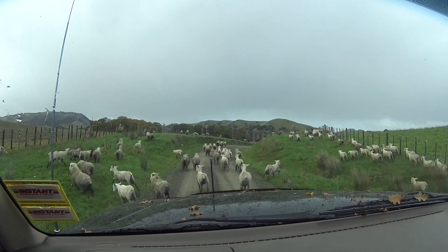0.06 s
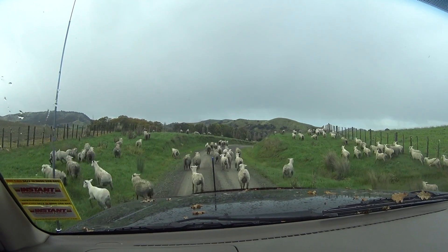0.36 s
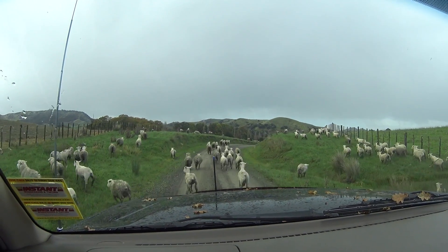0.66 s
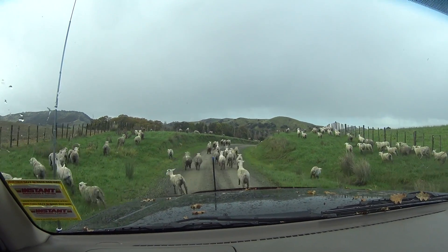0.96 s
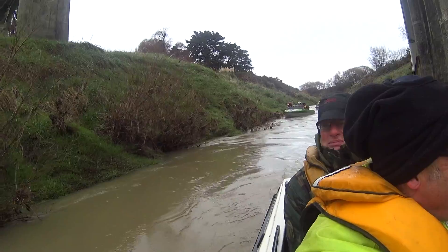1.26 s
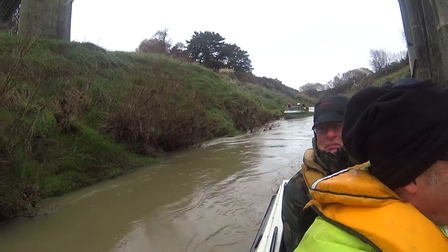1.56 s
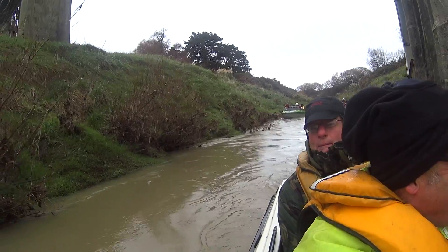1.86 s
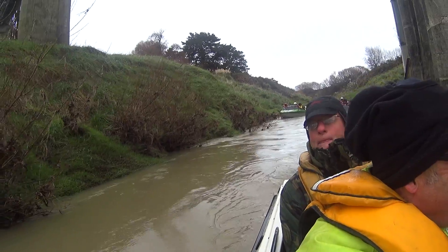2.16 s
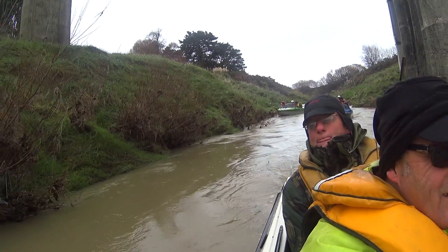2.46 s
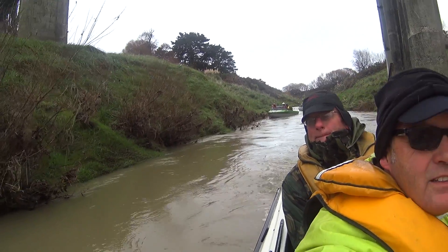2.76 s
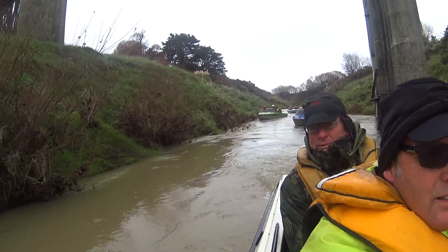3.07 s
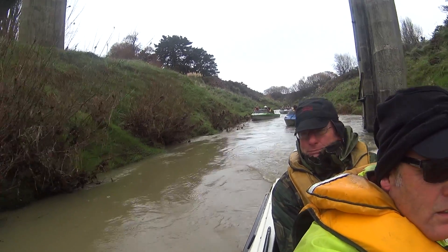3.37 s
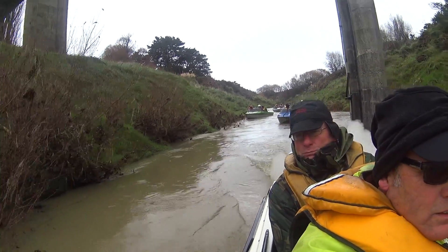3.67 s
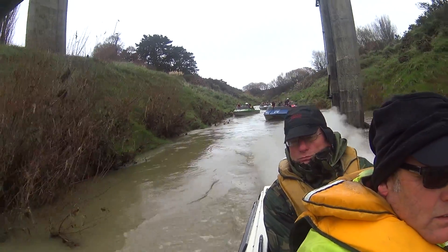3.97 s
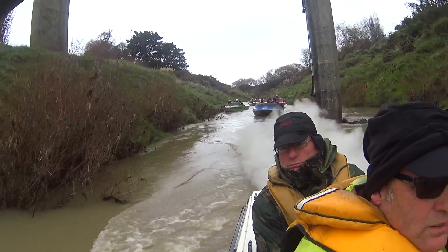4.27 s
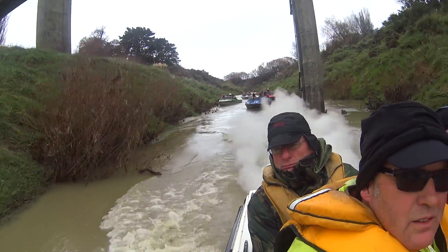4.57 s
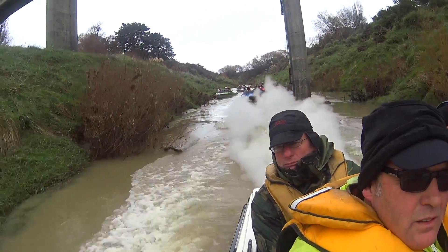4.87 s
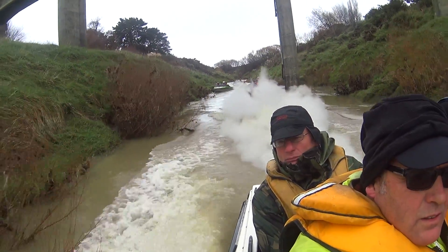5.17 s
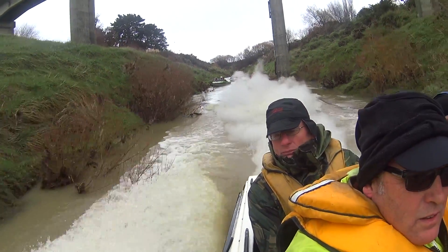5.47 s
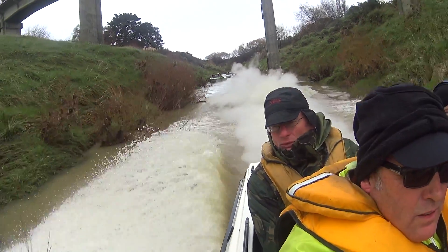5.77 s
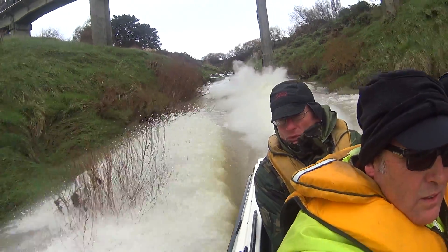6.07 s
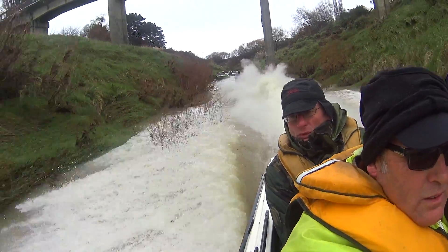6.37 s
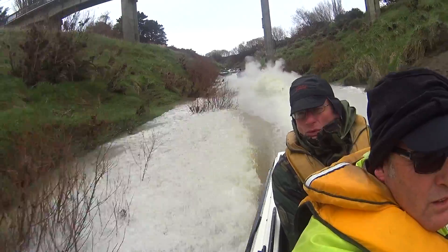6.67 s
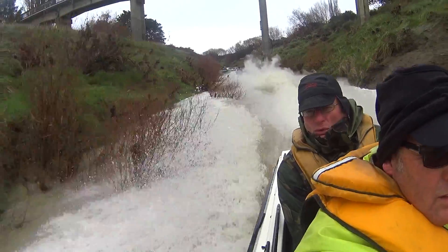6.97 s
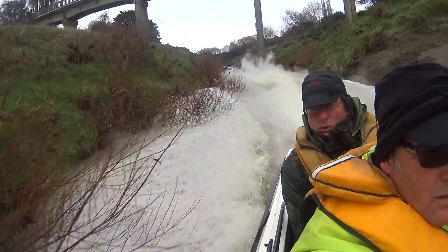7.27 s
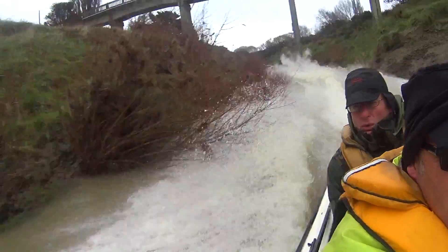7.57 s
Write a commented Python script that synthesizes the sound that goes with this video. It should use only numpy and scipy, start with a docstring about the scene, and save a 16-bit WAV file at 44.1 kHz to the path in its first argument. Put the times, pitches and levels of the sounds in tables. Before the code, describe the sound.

Quiet road rumble inside a car ends with a soft thud after about a second. The sound switches suddenly to a jet boat on a river, heard from aboard, its engine burbling at idle among small knocks and splashes. The engine then revs up hard, droning and rasping as the jet churns the water. Spray hisses louder and louder over low wind buffeting, and the revs ease a little near the end.

```python
"""First a car rolls quietly for a second, heard from inside, and goes over a soft bump.
Then we are suddenly aboard a V8 jet boat on a river, its engine burbling at idle among small knocks.
At about two seconds it revs up hard: the exhaust drones and rasps, and the jet churns the water.
The hull rises to skim the river (it planes), and the sheet of spray hisses ever louder.
Near the end the engine eases back a little."""
import sys
import numpy as np
from scipy import signal
from scipy.fft import rfft, irfft, next_fast_len
from scipy.io import wavfile

SR = 44100
rng = np.random.default_rng(int(sys.argv[2]) if len(sys.argv) > 2 else 0)


def transcribe(u):
    """Save the signal u as a 16-bit wav file named by the first command-line argument.

    u: samples, shape (n,) or (channels, n), limited to [-1, 1]; the rate is SR.
    q: integer samples, one column per channel.
    """
    v = np.clip(np.atleast_2d(u).T, -1, 1)
    q = np.round(v * 32767).astype(np.int16)
    wavfile.write(sys.argv[1], SR, q)


N = 340893
TIME = np.arange(N) / SR
PADDED = next_fast_len(N + 4096)


def from_db(db):
    """Turn decibels into a number to multiply by."""
    return 10 ** (np.asarray(db) / 20)


def rms_one(x):
    """Scale a sound so that its average strength (rms) is 1."""
    return x / np.sqrt(np.mean(x ** 2) + 1e-20)


def in_time(*tables):
    """Join the (time_s, value) points of the tables with straight lines."""
    return np.interp(TIME, *np.vstack(tables).T)


def ramp(start_s, length_s):
    """Rise evenly from 0 to 1."""
    return np.clip((TIME - start_s) / length_s, 0, 1)


def swells(rows):
    """Add up bell-shaped rises and dips, in dB."""
    return sum(db * np.exp(-((TIME - s) / half_s) ** 2) for s, half_s, db in rows)


def drift(rate_hz):
    """A smooth random wobble, about 1 in size."""
    step = 40   # samples between random points
    pole = np.exp(-2 * step * np.pi * rate_hz / SR)
    noise = rng.standard_normal(N // step + 2002)
    slow = signal.lfilter([1], [1, -2 * pole, pole * pole], noise)[2000:]
    return np.interp(np.arange(N) / step, np.arange(len(slow)), rms_one(slow))


def coloured(x, spectrum, skirt_db=18):
    """Shape a sound by a (pitch_hz, level_db) table; past its ends, lose skirt_db per octave."""
    hz, db = np.transpose(spectrum)
    bins = np.maximum(np.arange(PADDED // 2 + 1) * SR / PADDED, 1)
    octaves_outside = np.abs(np.log2(bins / np.clip(bins, hz[0], hz[-1])))
    gain = from_db(np.interp(np.log(bins), np.log(hz), db) - skirt_db * octaves_outside)
    return irfft(rfft(x, PADDED) * gain, PADDED)[..., :N]


def placed(x, sides):
    """Make one side louder and the other quieter, pitch by pitch."""
    left, right = np.broadcast_to(x, (2, N))
    return np.array([coloured(left, np.multiply(sides, [1, .5]), skirt_db=0),
                     coloured(right, np.multiply(sides, [1, -.5]), skirt_db=0)])


def turbulence(spectrum, width):
    """Rushing stereo noise of strength 1; more width makes left and right less alike."""
    mid, side = rng.standard_normal((2, N))
    return rms_one(coloured(mid + width * side * np.array([[1], [-1]]), spectrum))


def resonating(hz, width_hz):
    """Noise of strength 1 that rings around one pitch."""
    pole = np.exp(-np.pi * abs(width_hz) / SR)
    section = [1, 0, -1, 1, -2 * pole * np.cos(2 * np.pi * hz / SR), pole * pole]
    return rms_one(signal.sosfilt([section, section], rng.standard_normal(N)))


def partial(cycles, multiple):
    """A pure tone of strength 1 at a multiple of the engine's cycle rate."""
    return np.sqrt(2) * np.sin(2 * np.pi * (multiple * cycles + rng.random()))


def unsteady(cycles, rough, flutter_hz, multiple):
    """A tone whose strength and timing wobble at random."""
    steady = np.exp(2j * np.pi * (multiple * cycles + rng.random()))
    flutter = 1 + rough * (drift(flutter_hz) + 1j * drift(flutter_hz))
    return (steady * flutter).real / np.sqrt(.5 + rough ** 2)


def car():
    """The road rumbles in the cabin, and one bump gives a dull thud."""
    # road noise: pitch_hz, level_db
    cabin = [(24, -11), (46, 2), (75, -9.5), (150, -3.5), (280, -19.5), (355, -16), (800, -27), (1050, -25),
             (1200, -17), (1980, -20), (2450, -15.5), (3400, -24), (4700, -21.5), (10000, -46)]
    start_s, pitch_hz, attack_s, decay_s = 0.97, 94, 0.003, 0.0051
    age = np.maximum(TIME - start_s, 0)
    envelope = np.exp(-age / decay_s) * (1 - np.exp(-age / attack_s))
    bump = from_db(-16) * np.sin(2 * np.pi * pitch_hz * age) * envelope
    return from_db(-47.5) * turbulence(cabin, width=0.42) - bump


def hull_boom_db(hz, planing):
    """An exhaust tone swells at pitches where the hull rings, less so once the stern lifts."""
    # the boom with the stern low: pitch_hz, level_db
    stern_low = [(75, -33), (105, -21), (116, -21.5), (126, -25.5), (155, -21), (175, -17.5), (192, -22),
                 (215, -15.5), (245, -20), (290, -33.5)]
    # the boom while planing: pitch_hz, level_db
    skimming = [(138, -28.5), (155, -27), (170, -22.5), (185, -28.5), (222, -20.5), (248, -25.5),
                (295, -31)]
    # the drone briefly swells or sags: time_s, half_length_s, change_db
    surges = [(1.88, 0.056, -13), (2.113, .04, 9), (2.416, .04, 4), (2.505, 0.023, -3), (2.65, 0.023, -2),
              (2.73, .05, 4.5), (4.062, 0.057, -6), (4.3, 0.039, 3), (4.69, .06, -3), (6.928, .06, 6.5),
              (7.053, 0.045, -3.5)]
    low_db = np.interp(hz, *np.transpose(stern_low))
    skimming_db = np.interp(hz, *np.transpose(skimming))
    idle_db = -12 * (1 - ramp(start_s=2.256, length_s=0.059))
    surge_db = swells(surges) + 1.74 * drift(5.2)
    return (1 - planing) * low_db + planing * skimming_db + idle_db + surge_db


def exhaust(cycles, fifth_db, eighth_db, bark_db, rough):
    """Each row of cylinders fires unevenly, making many tones; multiples 5 and 8 boom."""
    # the other exhaust tones: cycle_multiple, level_db
    tones = [(2, -8), (3, -2.5), (4, -4), (6, -1), (7, -9.5), (9, -20), (10, -2.5), (11, -4), (12, 1),
             (13, -4.5), (14, -11.5), (15, -12), (16, -2.5), (17, -4.5), (18, -3), (19, -13), (20, -31),
             (21, -7), (22, -14)]
    # how the pipes and hull ring: pitch_hz, gain_db
    pipes = [(45, -7), (70, -1.5), (88, -4), (110, 0), (190, 2.5), (225, 4), (300, -1.5), (368, 3.5),
             (440, -0.5), (510, -1), (620, -2), (900, -15)]
    # rushing gas: pitch_hz, level_db
    rumble = [(30, -23), (60, -25), (95, -1.5), (120, -4), (200, 3), (330, -2), (480, 0.5), (700, -9.5),
              (1100, -17.5)]
    # the idle burble's noise: pitch_hz, level_db
    idle_rumble = [(22, -30), (46, -29), (65, -18), (115, 2.5), (200, -5.5), (300, -14), (500, -24)]
    # the burble's loudness: time_s, level_db
    burble_levels = [(1.08, -37), (1.55, -35.5), (1.87, -38), (2.1, -27.5), (2.22, -27.5), (2.4, -37),
                     (3.0, -62)]
    boom = from_db(fifth_db) * unsteady(cycles, .22 * rough, flutter_hz=15, multiple=5)
    boom += from_db(eighth_db) * unsteady(cycles, 0.47 * rough, flutter_hz=12, multiple=8)
    # timing errors blur the high multiples most
    bark = sum(from_db(db) * unsteady(cycles, rough * (.5 + 0.078 * k), 5.2, k) for k, db in tones)
    bark = from_db(bark_db + 0.13 - 4.1 * rough) * rms_one(coloured(bark, pipes))
    # ragged firing turns part of the bark into a rush of gas
    gas = from_db(bark_db + 3.5) * rough * turbulence(rumble, width=0.36)
    burble = turbulence(idle_rumble, width=0.12) + 0.2 * partial(cycles, multiple=3)
    return boom + bark + gas + from_db(in_time(burble_levels)) * burble


def rasp(cycles, rasp_db, rough):
    """Hiss puffs with the firings; clatter and a crack repeat each cycle while the pump whines."""
    # tone colour of the hiss and clatter: pitch_hz, level_db
    colour = [(700, -17), (1100, -24.5), (1400, -5.5), (1750, -3), (1980, -7.5), (2230, 3), (2550, -0.5),
              (3300, -12.5), (4500, -12.5), (5400, -20), (6600, -24.5), (7600, -47), (8650, -43),
              (11000, -52)]
    # whine of the jet pump and drive line: cycle_multiple, level_db
    pump_tones = [(24, -27), (26, -35), (28, -29), (30, -27), (36, -21), (40, -22.5), (42, -21.5),
                  (48, -22), (50, -22.5), (52, -28)]
    puffs = 0.068 * partial(cycles, 1) + 0.047 * partial(cycles, 4) + 0.1 * partial(cycles, 5)
    hiss = turbulence(colour, width=0.33) * (1 + puffs) * from_db(0.16 * drift(25))
    shaky_cycles = cycles + .001 * drift(10)
    clatter = sum(partial(shaky_cycles, k) / k ** 2 for k in range(23, 72))
    clatter = from_db(-6.5) * rms_one(coloured(clatter, colour))
    once_a_cycle = np.diff(np.floor(shaky_cycles), prepend=0)
    crack_band = signal.butter(2, [450, 2000], "band", fs=SR, output="sos")
    crack = rms_one(signal.sosfilt(crack_band, once_a_cycle))
    pump = sum(from_db(db) * unsteady(shaky_cycles, 0.57, 3.8, k) for k, db in pump_tones)
    snarl = clatter + from_db(-12 + 2.1 * np.tanh(drift(10))) * crack + from_db(6.5) * pump
    # the snarl only stands out while the engine fires evenly
    evenness = np.clip(1 - rough, 0, 1) ** 2
    return from_db(rasp_db) * (from_db(-2) * hiss + evenness * snarl)


def ringing(bark_db, rasp_db, howl_db, buzz_db):
    """The exhaust shakes the hull, three rings follow the rasp, and airflow makes the intake howl."""
    # a buzzing hull panel: pitch_hz, width_hz, gain_db
    hull_panel = (350, 59, -6.5)
    # a mid ring near 1.7 kHz and two faint, thin treble rings: pitch_hz, width_hz, gain_db
    rasp_rings = [(1715, 133, -11), (6590, 270, -32.5), (8380, 500, -34.5)]
    # the air intake: pitch_hz, width_hz, gain_db
    intake = (2324, 223, -6.5)
    driven = ((bark_db + buzz_db, [hull_panel]), (rasp_db + buzz_db, rasp_rings), (howl_db, [intake]))
    return sum(from_db(drive_db + db) * resonating(hz, width_hz)
               for drive_db, rings in driven for hz, width_hz, db in rings)


def wind(wind_db):
    """Moving air buffets in low, lumpy gusts."""
    # the buffeting: pitch_hz, level_db
    buffeting = [(22, -10), (45, 9), (90, -3), (200, -18)]
    return from_db(wind_db + 1.5 * drift(4)) * turbulence(buffeting, width=0.45)


def water(churn_db, spray_db):
    """The jet churns the river and spray hisses and patters; later a fine mist brightens it."""
    # churning water: pitch_hz, level_db
    churn_colour = [(350, -14), (650, -0.5), (900, -5.5), (1300, 1), (1800, -7.5), (3000, -21)]
    # the jet digs in as the boat pulls away: time_s, half_length_s, extra_db
    dig = (3.26, 0.26, 5.7)
    # hissing spray: pitch_hz, level_db
    spray_colour = [(1000, -29), (2000, -7.5), (2620, 8), (3250, 3), (3900, 3), (4550, 5.5), (5200, -2.5),
                    (6100, -7), (6800, -7), (7800, -11.5), (8800, -13), (9600, -19), (11000, -25.5)]
    # the hull throws up heavier spray: time_s, half_length_s, extra_db
    heavy_sheets = [(4.129, .1, 1.5), (4.6, 0.16, 1.3), (5.875, 0.1, 1.2), (6.652, 0.092, 1.2)]
    # where the water is heard: pitch_hz, left_minus_right_db
    sides = [(1000, -3), (3300, 0.5), (5850, 4.5), (10400, 1)]
    churn = turbulence(churn_colour, width=0.25) * from_db(churn_db + swells([dig]) + drift(25))
    drops_per_s = 2500
    drop_sizes = rng.standard_normal(N) * from_db(3 * np.minimum(rng.exponential(1, N), 4))
    drops = (rng.random(N) < drops_per_s / SR) * drop_sizes
    sheet = turbulence(spray_colour, width=0.2) + from_db(-8.5) * rms_one(coloured(drops, spray_colour))
    treble_only = signal.butter(2, 5600, "high", fs=SR, output="sos")
    mist = signal.sosfilt(treble_only, turbulence(spray_colour, width=0.31))
    mist *= from_db(-7 + 12 * ramp(start_s=4.96, length_s=1.13))
    spray = (sheet + mist) * from_db(spray_db + swells(heavy_sheets) + 0.74 * drift(15))
    return placed(churn + spray, sides)


def knocks():
    """Each knock or splash is a burst of ringing noise that dies away."""
    # knocks and splashes at idle: start_s, level_db, pitch_hz, width_hz, decay_s
    bursts = [(1.1, -50, 4370, 700, 0.22), (1.3, -46, 1751, 500, .008), (1.4, -55, 6500, 2000, .025),
              (1.5, -38.5, 2050, 1100, 0.035), (1.836, -51, 9000, 2400, 0.0027)]
    return sum(from_db(db) * (TIME >= s) * np.exp(-np.abs(TIME - s) / decay_s) * resonating(hz, width_hz)
               for s, db, hz, width_hz, decay_s in bursts)


def whistle(cycle_hz):
    """A thin, breathy tone climbs with the revs and sinks into the hiss."""
    # the whistle's loudness: time_s, level_db
    levels = [(2.74, -80), (2.82, -53), (2.88, -50), (2.97, -63), (3.2, -59), (3.5, -76)]
    sounding = (TIME > levels[0][0]) & (TIME < levels[-1][0])
    gain = from_db(in_time(levels) + 4 * np.tanh(drift(14)))
    return sounding * gain * unsteady(np.cumsum(cycle_hz) / SR, rough=2.5, flutter_hz=220, multiple=325)


def level(rule, state):
    """A source's base level in dB, changed by the revs, the throttle and the hull's pace."""
    return rule[0] + np.dot(rule[1:], state)


def jet_boat():
    """Revs, throttle and the hull's pace set how loud the engine, wind and water are."""
    # engine speed at idle, then under power: time_s, cycle_hz (one cycle is two turns)
    idle = [(1.08, 15), (2.11, 14.3)]
    run = [(2.27, 21.77), (2.39, 23.84), (2.44, 24.39), (2.54, 24.35), (2.71, 24.93), (2.92, 27.56),
           (3.3, 32.0), (3.43, 32.93), (3.91, 35.03), (4.29, 36.1), (5.01, 37.1), (5.78, 36.92),
           (6.0, 36.16), (6.25, 34.01), (6.98, 30.7), (7.2, 28.15), (7.39, 27.86), (7.73, 27.87)]
    # how fast the hull moves: time_s, share_of_top_pace
    pace = [(1.9, 0.05), (2.35, 0.29), (2.9, 0.42), (3.5, 0.61), (4.15, 0.79), (4.6, 0.83), (5.3, 0.89),
            (5.9, 0.93), (7.7, 1)]
    # loudness rules: base_db, db_per_octave_of_revs, throttle_shut_change_db, at_rest_change_db
    bark_rule = (-23, 11, -22, 3)
    rasp_rule = (-19.5, 7.5, -7.5, -6)
    buzz_rule = (-11, -7.5, -13.5, 13)   # added to the bark or rasp that it follows
    howl_rule = (-19, 19.5, -8, -3)
    wind_rule = (-48.5, -8, 10, -21)
    churn_rule = (-28.5, 6, -11.5, -6)
    spray_rule = (-22.5, 0, -2.5, -26.5)
    # the exhaust briefly growls harder: time_s, half_length_s, extra_db
    growls = [(3.147, 0.4, 2), (5.06, 0.073, 4)]
    # where the engine is heard: pitch_hz, left_minus_right_db
    sides = [(60, 8), (110, -4), (190, -5), (330, -6.5), (590, -6.5), (1050, 2.5), (1860, -1.5), (3300, -5),
             (9000, -5.5)]
    # the throttle opens, the jet loads the engine, the hull starts to plane: start_s, length_s
    opening = (1.896, 0.15)
    loading = (1.958, 0.36)
    climbing = (4.41, 0.16)
    cycle_hz, flat_out_hz = in_time(idle, run), 37
    octaves = np.log2(cycle_hz / flat_out_hz)
    shut, unloaded, planing = 1 - ramp(*opening), 1 - ramp(*loading), ramp(*climbing)
    slowness = 1 - in_time(pace)
    # the intake side answers the throttle at once; exhaust and jet follow as the load builds
    prompt, lagging = np.array([octaves, shut, slowness]), np.array([octaves, unloaded, slowness])
    bark_db = level(bark_rule, lagging) + swells(growls)
    rasp_db = level(rasp_rule, prompt)
    # firing is more ragged at low revs, and a little more while planing
    rough = np.clip(0.17 - 0.48 * octaves + 0.083 * planing, 0, 1)
    cycles = np.cumsum(cycle_hz * (1 + 0.0053 * rough * drift(14.4))) / SR
    fifth_db, eighth_db = hull_boom_db(5 * cycle_hz, planing), hull_boom_db(8 * cycle_hz, planing)
    engine = exhaust(cycles, fifth_db, eighth_db, bark_db, rough) + rasp(cycles, rasp_db, rough)
    engine += ringing(bark_db, rasp_db, level(howl_rule, prompt), level(buzz_rule, lagging))
    engine += whistle(cycle_hz)
    # the engine sounds nearer the centre at idle and further right under power
    centred = 0.4 * unloaded
    engine = (1 - centred) * placed(engine, sides) + centred * engine
    boat = engine + knocks() + wind(level(wind_rule, lagging))
    return boat + water(level(churn_rule, lagging), level(spray_rule, lagging))


def scene():
    """The car gives way suddenly to the boat."""
    aboard_s, fade_s = 1.08, 0.03
    aboard = ramp(aboard_s - fade_s / 2, fade_s)
    return aboard * jet_boat() + (1 - aboard) * car()


def record(dry):
    """Cut away the highest treble steeply."""
    cutoff_hz = 10950
    return signal.sosfilt(signal.ellip(12, .1, 90, cutoff_hz, fs=SR, output="sos"), dry)


dry = scene()
out = record(dry)
transcribe(out)
```